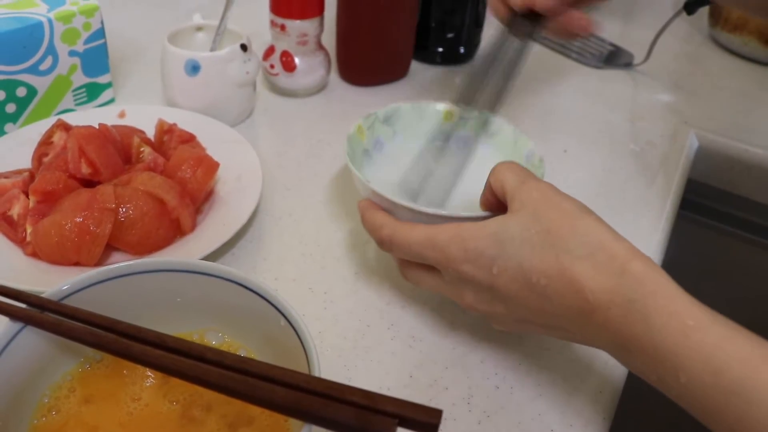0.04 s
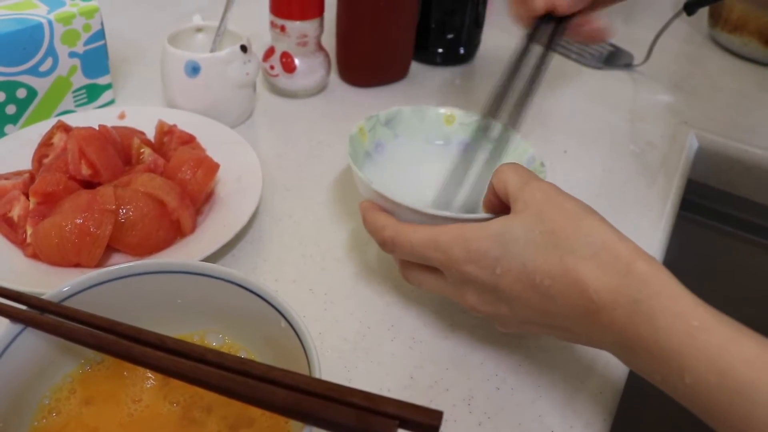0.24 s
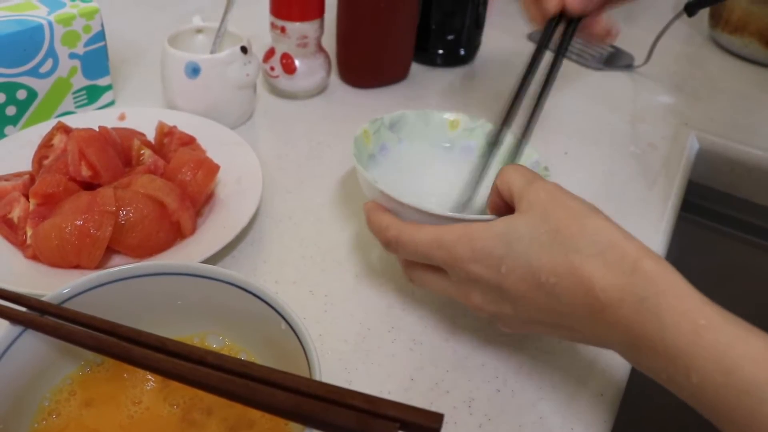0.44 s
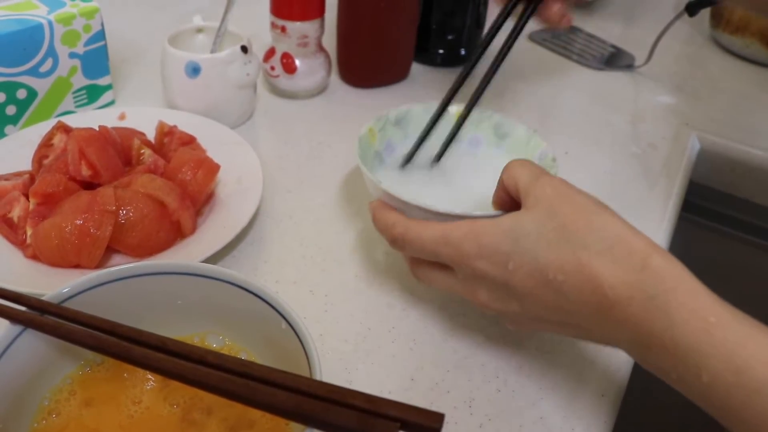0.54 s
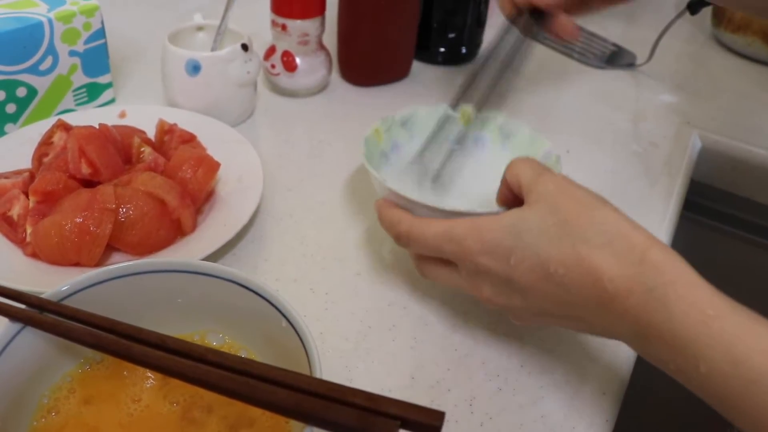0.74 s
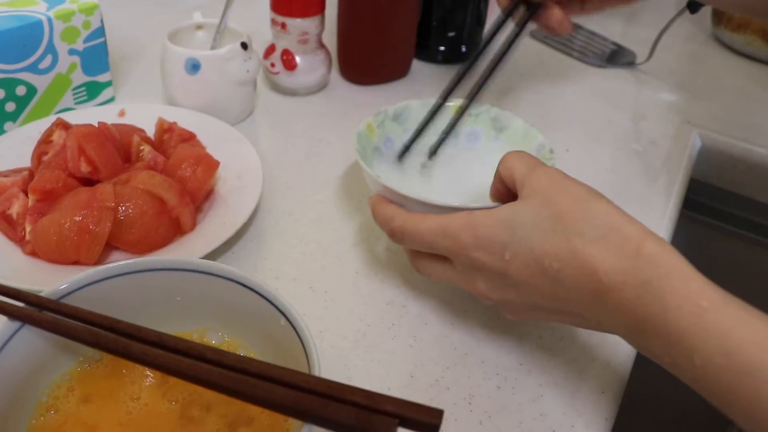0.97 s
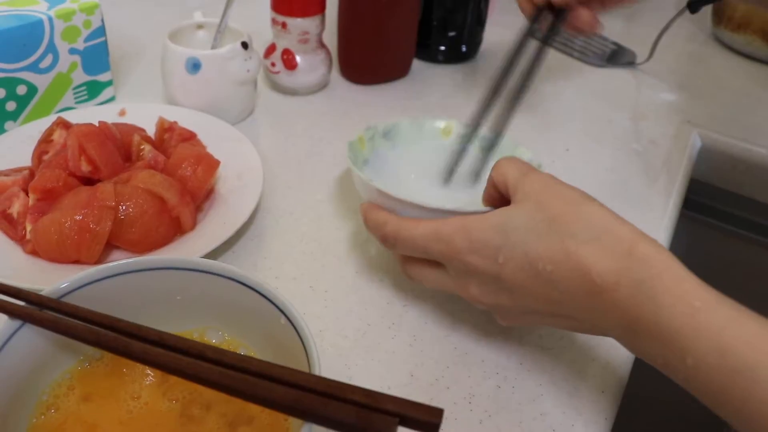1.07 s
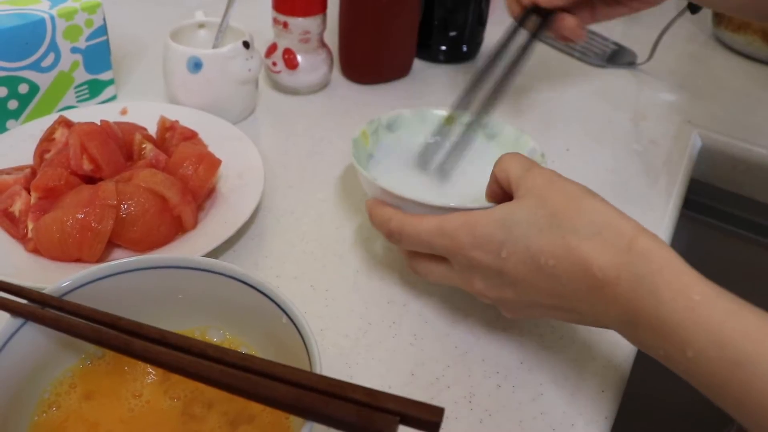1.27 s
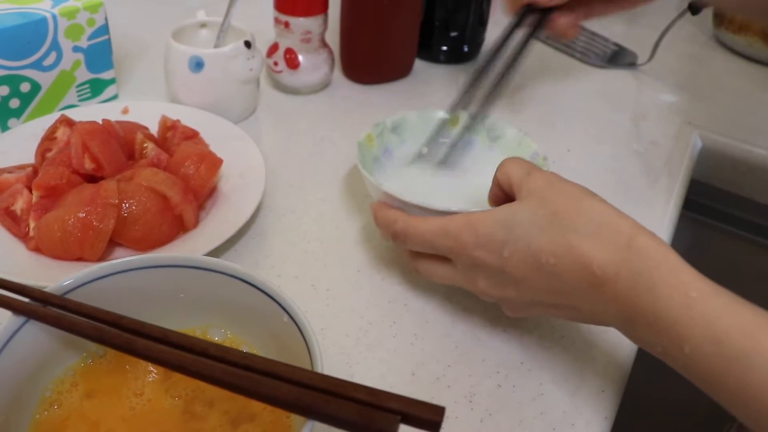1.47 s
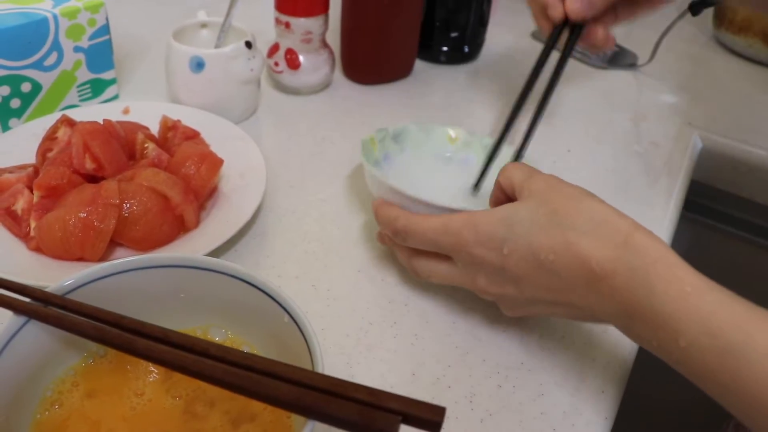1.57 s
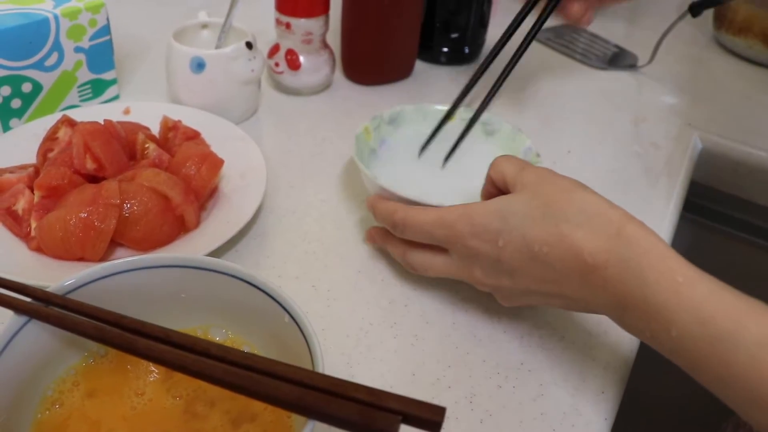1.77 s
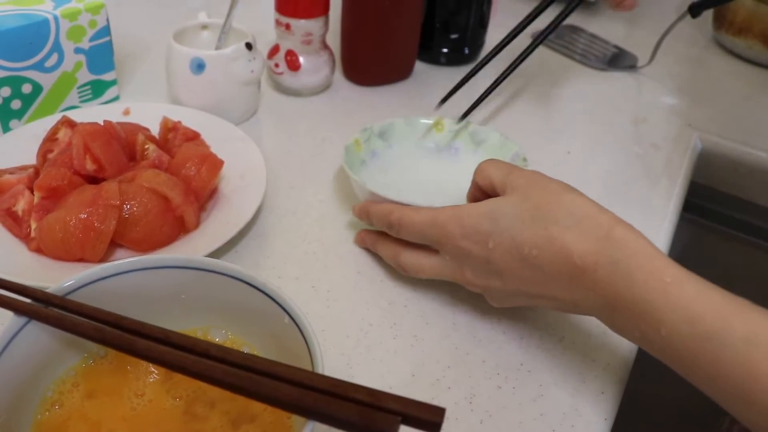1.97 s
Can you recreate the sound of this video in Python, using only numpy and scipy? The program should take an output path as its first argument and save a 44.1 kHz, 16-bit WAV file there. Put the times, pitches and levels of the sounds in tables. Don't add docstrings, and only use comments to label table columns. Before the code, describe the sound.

Chopsticks stir thin liquid in a small ceramic bowl, then a rim clink and two knocks

```python
import sys
import numpy as np
from scipy import signal
from scipy.fft import rfft, irfft, next_fast_len
from scipy.io import wavfile
from scipy.ndimage import uniform_filter1d, map_coordinates

SR = 44100
rng = np.random.default_rng(int(sys.argv[2]) if len(sys.argv) > 2 else 0)


def nominal_scale(level):
    x = np.asarray(level, float) / 20
    return 10 ** x


def master(y):
    cut = np.clip(np.atleast_2d(y).T, -1, 1)
    pcm = np.round(cut * 32767)
    wavfile.write(sys.argv[1], SR, pcm.astype(np.int16))


N = 88817

# [f/Hz, level/dB]
AIR_COLOUR = [(25, -19.5), (130, -1), (240, -6), (400, -5.5), (650, -13.5), (3030, -17.5), (4300, -24),
              (9660, -19.5), (13000, -25.5), (15800, -28)]
# [f/Hz, likeness 0-1]
CHANNEL_LIKENESS = [(40, 0.36), (130, 0.88), (290, 0.77), (640, 0.38), (1400, 0.078), (6000, 0)]
# [f/Hz, rms level/dB]
FRIDGE_LINES = [(36, -70), (182.5, -57.5), (320, -70.5)]
# [f/Hz, t60/s]
KITCHEN_T60 = [(150, 0.47), (260, 0.76), (400, 0.39), (1000, 0.44), (3000, 0.37), (8000, 0.11)]
# [f/Hz, level/dB]
KITCHEN_COLOUR = [(50, -38), (120, -5.5), (300, 1.5), (800, -0.5), (2000, -2.5), (3500, -14.5), (5000, -22),
                  (9000, -3.5)]
# [t/s, level/dB, hardness f/Hz, first snap level/dB]
KNOCKS = [
    (1.6277, 9, 3940, 11.5),
    (1.9945, 3.5, 2000, -27),
]
# [f/Hz, width/Hz, level/dB]
WORKTOP_MODES = [(1540, 224, 2), (428, 143, 1.5), (275, 108, -3), (3170, 230, -21), (1110, 284, 1),
                 (2130, 49, -17), (660, 215, -2)]
# [delay t/s, level/dB, left lag t/s]
KNOCK_ECHOES = [
    (0, -0.5, .0001),
    (.0018, 0.5, -.00005),
    (.0039, -7.5, .0001),
    (.0068, -8, -.00005),
]
# [f/Hz, level/dB, t60/s]
BOWL_MODES = [(2008, -16, 0.16), (3730, 0.5, 0.017), (5356, -30.5, .05), (6020, -13, 0.042),
              (6220, 2.5, 0.014), (6700, -24.5, 0.027), (6820, -21, 0.037), (8540, 1.5, 0.02),
              (8700, -23, 0.023), (11590, -11, 0.026), (14980, -22, .03), (15600, -24, .07),
              (12600, -21, .02)]
# [f/Hz, level/dB, t60/s]
RIM_NOTES = [(7650, -26, .2), (8595, -33, .35), (11220, -29, .15), (11580, -29, .3), (6078, -36, .25)]
# [t/s, peak level/dB, f/Hz, dull stick level/dB]
TICKS = [(0.1115, -40, 8900, -4), (0.023, -46, 12000, -8), (.196, -49, 11600, -8), (0.268, -50.5, 7700, -1),
         (0.3062, -51, 10000, 2), (0.367, -45, 6330, -6), (0.4634, -52.5, 9700, 16),
         (0.5277, -50, 10500, -12), (.582, -47, 6440, -10), (0.707, -54, 11400, -4),
         (.826, -50.5, 4240, 11), (.8914, -50, 11000, -6), (0.9046, -42, 11100, -8),
         (1.1787, -53, 7110, -8), (1.217, -50, 6000, 5), (1.3523, -52, 7600, -10), (0.567, -44, 6140, -16),
         (0.6746, -49, 4230, 9), (0.8043, -50, 11050, -7), (0.9144, -43, 11400, -2),
         (0.9387, -40, 6300, -18), (1.0103, -44.5, 8660, -4), (1.0244, -40, 7630, -3),
         (1.1861, -46.5, 7670, 2), (1.272, -47.5, 4500, 23), (1.3659, -39, 7760, -16),
         (1.4479, -35, 8630, 2), (1.4792, -39, 8740, -1), (1.532, -41.5, 5970, 9.5),
         (1.773, -47.5, 4500, -17), (1.803, -47, 7100, -10.5)]
# [t/s, peak level/dB, first f/Hz, last f/Hz, climb t/s]
GULPS = [
    (1.342, -48, 2100, 2950, .014),
    (1.4495, -42, 1550, 2400, .007),
    (1.4562, -33, 2300, 3230, .005),
    (.224, -52, 1900, 2400, .016),
]
# [t/s, peak level/dB, f/Hz, rise over life
# 0-1, t60/s]
BUBBLES = [(.118, -53, 2900, 0.1, 0.023), (.209, -53, 1630, 0.06, 0.067), (.024, -53, 1920, 0.02, 0.016),
           (.03, -52.5, 2800, 0.06, 0.032), (.043, -54, 1800, 0.07, 0.017), (.18, -54, 1930, 0.1, 0.021),
           (.483, -55, 1800, .05, .02), (1.394, -52, 2200, 0, .04), (0.267, -53, 1630, 0.1, 0.023),
           (.350, -54.5, 2570, 0.3, 0.031), (0.405, -55.5, 1776, 0.08, 0.028),
           (.575, -41.5, 2040, 0.06, 0.029), (0.656, -51, 4360, 0, 0.012), (.703, -46.5, 2800, 0.03, 0.042),
           (0.802, -43.5, 1800, 0.1, 0.025), (0.826, -45.5, 2710, 0.13, 0.022),
           (.834, -49, 2950, 0.03, .02), (.934, -52.5, 1953, 0.02, 0.042),
           (1.015, -40.5, 1484, 0.21, 0.064), (1.204, -51.5, 955, 0.19, 0.019),
           (1.26, -47, 2200, 0.29, 0.023), (1.287, -47.5, 1250, 0.06, 0.027),
           (1.4475, -42.5, 1397, 0.23, 0.055), (1.473, -47, 2090, .05, .03), (1.483, -51, 1950, 0, 0.025),
           (1.6215, -36, 2290, 0.1, 0.0093)]
# [f/Hz, width/Hz, level/dB]
LIQUID_MODES = [(1760, 234, -2), (2900, 280, 1.5)]
# [f/Hz, level/dB]
GLAZE_COLOUR = [(3500, -22), (3800, 4), (5000, 2.5), (6280, 3.5), (8000, 1.5), (11400, 6.5), (13500, 0),
                (16000, 2.5)]
# [f/Hz, width/Hz, level/dB]
GLAZE_RINGS = [(6180, 190, 0.5), (7630, 110, 7), (11400, 850, -1)]
# [middle t/s, half length t/s, scrape level/dB, slosh level/dB]
STROKES = [(0.032, 0.044, -53, -59), (0.134, 0.035, -61.5, -62), (0.226, 0.054, -60, -61.5),
           (0.364, 0.036, -56, -66.5), (0.451, 0.064, -59.5, -61), (0.575, 0.032, -54.5, -58),
           (0.662, 0.051, -59, -59.5), (0.712, 0.033, -54, -56.5), (0.801, 0.046, -58.5, -57),
           (0.931, 0.036, -51, -53), (1.018, 0.027, -52.5, -53.5), (1.126, 0.027, -70, -65),
           (1.186, 0.032, -56, -59), (1.281, 0.035, -62, -53), (1.382, 0.034, -53.5, -54.5),
           (1.483, 0.02, -54, -54.5), (1.573, 0.057, -79, -53.5)]


def unit(x):
    return x / np.sqrt(np.mean(x ** 2) + 1e-20)


def along(points, hz):
    f, v = np.transpose(points)
    return np.interp(np.log(hz + 1), np.log(f + 1), v)


def wobble(rate):
    knots = rng.standard_normal(int(N * rate / SR) + 4)
    return map_coordinates(knots, [np.arange(N) * rate / SR])


def flutter_db(t):
    return 2.5 * map_coordinates(rng.standard_normal(64), [t * 400])


def phase_blur(t, step):
    return step * rng.standard_normal(len(t)).cumsum()


def filtered(x, response):
    m = next_fast_len(N + SR // 2)
    return irfft(rfft(x, m) * response(np.fft.rfftfreq(m, 1 / SR)), m)[..., :N]


def peaks(table):
    def response(f):
        return sum((-1) ** k * nominal_scale(db) * 1j * f * width / (hz * hz - f * f + 1j * f * width)
                   for k, (hz, width, db) in enumerate(table))
    return response


def low_cut(hz):
    return lambda f: (1j * f / (hz + 1j * f)) ** 2


def add(track, s, sound):
    part = track[round(s * SR):][:len(sound)]
    part += sound[:len(part)]


def placed(x, pan_db, lag_s, low_db=None):
    sides = np.array([[1], [-1]])
    if low_db is None:
        low_db = pan_db

    def response(f):
        side_db = pan_db + (low_db - pan_db) / (1 + (f / 1800) ** 2)
        return nominal_scale(side_db / 2 * sides) * np.exp(-1j * np.pi * f * lag_s * sides)
    return filtered(x[None], response)


def pair(a, b):
    def mid_and_side(f):
        turn = np.arccos(np.clip(along(CHANNEL_LIKENESS, f), 0, 1)) / 2
        return np.array([np.cos(turn), np.sin(turn)])
    mid, side = filtered(np.array([a, b]), mid_and_side)
    return np.array([mid + side, mid - side])


def room_air():
    noise = filtered(rng.standard_normal((2, N)), lambda f: nominal_scale(along(AIR_COLOUR, f)))
    return nominal_scale(-56.5) * unit(pair(*noise))


def fridge():
    t, hum = np.arange(N) / SR, np.zeros(N)
    for hz, db in FRIDGE_LINES:
        level_db = db + 2 + 2 * wobble(13.77)
        hum += nominal_scale(level_db) * np.sin(2 * np.pi * hz * t + 0.3 * wobble(10.06))
    return hum


def kitchen(x):
    build_s, hall_s, hall_wide_s, hall_db, patchy_db = 0.0053, 0.11, 0.019, -9, 2
    hz, t, z = signal.stft(rng.standard_normal((2, SR * 3 // 4)), SR, nperseg=256)
    clumps = uniform_filter1d(rng.standard_normal(z.shape[1:]), size=3, axis=0)
    clumps = unit(uniform_filter1d(clumps, size=6, axis=1))
    hall = nominal_scale(hall_db) * np.exp(-((t - hall_s) / hall_wide_s) ** 2)
    swell = (1 - np.exp(-t / build_s)) * (1 + hall)
    level_db = patchy_db * clumps - 60 * t / along(KITCHEN_T60, hz)[:, None]
    tail = signal.istft(z * nominal_scale(level_db) * swell, SR, nperseg=256)[1]
    wet = signal.fftconvolve(x[None], tail / np.linalg.norm(tail[0]), axes=1)[:, :N]
    return pair(*filtered(wet, lambda f: nominal_scale(along(KITCHEN_COLOUR, f))))


def near_walls(x):
    t60, build_s = 0.2, 0.0013
    t = np.arange(SR // 4) / SR
    tail = rng.standard_normal((2, len(t))) * nominal_scale(-60 * t / t60) * (1 - np.exp(-t / build_s))
    return signal.fftconvolve(x[None], tail / np.linalg.norm(tail[0]), axes=1)[:, :N]


def knocks():
    snap_lead_s = 0.00023
    push, snap, t = np.zeros(N), np.zeros(N), np.arange(SR // 100) / SR
    for s, db, hardness_hz, snap_db in KNOCKS:
        shape = np.exp(-(4 * hardness_hz * t - 2) ** 2)
        add(push, s, nominal_scale(db) * shape / shape.sum())
        snap[round((s - snap_lead_s) * SR)] = -nominal_scale(snap_db)

    def worktop(f):
        return sum(peaks([mode])(f) for mode in WORKTOP_MODES) * low_cut(301)(f)

    def snap_colour(f):
        return peaks([(4300, 3240, 0)])(f) ** 2 / (1 + (f / 13300) ** 16)
    return push, nominal_scale(-3.5) * (10 * filtered(push, worktop) + filtered(snap, snap_colour))


def thrown_knocks(blows, dull):
    out = np.zeros((2, N))
    for delay, db, lag in KNOCK_ECHOES:
        echo = np.roll(dull if delay else blows, round(delay * SR))
        out += nominal_scale(db) * placed(echo, -10.5, lag, low_db=0.5)
    return out


def clink():
    t = np.arange(SR // 4) / SR
    ring = np.zeros(len(t))
    for modes, blur in ((BOWL_MODES, 1), (RIM_NOTES, 0.35)):
        for hz, db, t60 in modes:
            sway = map_coordinates(rng.standard_normal(80), [t * 300])
            sway_db = 4 * np.minimum(t / 0.0047, 1) * sway
            phase = 2 * np.pi * hz * t + phase_blur(t, blur * 0.11 * hz / 8000)
            ring += nominal_scale(db + sway_db - 60 * t / t60) * np.sin(phase)
    crack = nominal_scale(-23 - 60 * t / 0.015) * np.diff(rng.standard_normal(len(t) + 1))
    out = np.zeros(N)
    add(out, 1.5769, nominal_scale(-16.5) * (1 - np.exp(-t / 0.00021)) * (ring + crack))
    return filtered(out, low_cut(1300))


def ticks():
    note_t60, crack_t60, stick_t60, stick_hz = 0.009, 0.0043, 0.0086, 2000
    out, t = np.zeros(N), np.arange(SR // 20) / SR
    for s, db, hz, dull_db in TICKS:
        note = nominal_scale(-60 * t / note_t60) * np.sin(2 * np.pi * hz * t + phase_blur(t, 0.12))
        grit = np.convolve(rng.standard_normal(len(t)), [1, 0, -1], "same")
        crack = nominal_scale(-3 - 60 * t / crack_t60) * grit
        stick = nominal_scale(dull_db - 6.5 - 60 * t / stick_t60) * np.sin(2 * np.pi * stick_hz * t)
        add(out, s, nominal_scale(db + 1.5) * (1 - np.exp(-t / 0.00027)) * (note + crack + stick))
    return out


def gulps():
    start_db, t60 = -8, 0.022
    out, t = np.zeros(N), np.arange(SR // 8) / SR
    for s, db, low_hz, high_hz, climb in GULPS:
        closed = np.clip(t / climb, 0, 1)
        ring_db = -60 * np.maximum(t - climb, 0) / t60
        level_db = db + start_db * (1 - closed) + ring_db + flutter_db(t)
        pitch = low_hz + (high_hz - low_hz) * np.sin(np.pi / 2 * closed) ** 2
        phase = 2 * np.pi * np.cumsum(pitch) / SR + phase_blur(t, 0.05)
        add(out, s, nominal_scale(level_db) * (1 - np.exp(-t / 0.001)) * np.sin(phase))
    return out


def bubbles():
    out, t = np.zeros(N), np.arange(SR // 8) / SR
    for s, db, hz, rise, t60 in BUBBLES:
        pitch = hz * (1 + rise * (1 - np.exp(-t / (0.14 * t60))))
        level_db = db + 3 - 30 * t / t60 - 60 * (t / t60) ** 2 + flutter_db(t)
        phase = 2 * np.pi * np.cumsum(pitch) / SR + phase_blur(t, 0.05)
        add(out, s, nominal_scale(level_db) * (1 - np.exp(-t / 0.0011)) * np.sin(phase))
    return out


def droplets():
    count, cycles, rise = 900, 9, 0.15
    when = rng.random((count, 1))
    octaves = 0.33 * np.maximum(rng.standard_normal((count, 1)), -2)
    size_db = 5 * np.minimum(rng.exponential(1, (count, 1)), 2)
    k = np.arange(SR // 80)
    hz = np.minimum(2200 * 2 ** octaves, 3100)
    u = k * hz / SR / cycles
    tone = np.sin(2 * np.pi * cycles * u * (1 + rise * u / 2))
    grains = nominal_scale(size_db) * u * np.exp(-4 * u) * tone
    places = (when * N).astype(int) + k
    return unit(np.bincount(places.ravel(), grains.ravel())[:N])


def slosh():
    pops_per_s = 3500
    pops = (rng.random(N) < pops_per_s / SR) * rng.standard_normal(N) * nominal_scale(2 * wobble(120))
    churn = filtered(pops, lambda f: peaks(LIQUID_MODES)(f) * peaks([(2300, 2500, 0)])(f) ** 2)
    return unit(unit(churn) + droplets())


def scrape():
    grit = rng.standard_normal(N) * nominal_scale(2 * wobble(270))

    def glaze(f):
        rings = 1 + 3 * nominal_scale(-6) * abs(peaks(GLAZE_RINGS)(f))
        return nominal_scale(along(GLAZE_COLOUR, f)) * (f > 3300) * rings
    return unit(filtered(grit, glaze))


def stirring():
    t = np.arange(N) / SR
    scrape_level, slosh_level = np.zeros(N), np.zeros(N)
    for middle, half, scrape_db, slosh_db in STROKES:
        stroke = np.exp(-2 * ((t - middle) / half) ** 2)
        scrape_level += nominal_scale(scrape_db) * stroke
        slosh_level += nominal_scale(slosh_db) * stroke
    return scrape_level * scrape() + slosh_level * slosh()


def scene():
    push, blows = knocks()
    rim = clink()
    bowl = stirring() + bubbles() + gulps() + ticks()
    dull = filtered(blows, lambda f: 1 / (1 + 1j * f / 2200) ** 3)
    near = placed(bowl, -7.5, 0.000036) + placed(rim, -7.5, 0.0000275)
    near += thrown_knocks(blows, dull)
    near += nominal_scale(-10.5) * near_walls(rim) + nominal_scale(1.5) * pair(*near_walls(dull))
    far = kitchen(nominal_scale(-10.5) * (bowl + rim) + nominal_scale(10) * push)
    return near + far + room_air() + fridge()


def band_limit(x):
    return signal.sosfilt(signal.butter(12, 16530, fs=SR, output="sos"), x)


def record(dry):
    duck_db, stays_db, hold_s, back_s = -9, -2, 0.035, 0.11
    splice_s, splice_half_s, splice_depth_db = 0.2536, 0.0083, -18
    clip_at, top_hz = 0.62, 15950
    t = np.arange(N) / SR
    since = t - KNOCKS[0][0]
    onset = np.clip((since - 0.001) / 0.0045, 0, 1)
    recovery = np.clip(1 - (since - hold_s) / back_s, 0, 1)
    gain_db = onset * (stays_db + duck_db * recovery)
    gain_db += splice_depth_db * np.clip(1 - abs(t - splice_s) / splice_half_s, 0, 1)
    clipped = np.clip(dry * nominal_scale(gain_db), -clip_at, clip_at)
    mix = filtered(clipped, lambda f: f < top_hz)
    return band_limit(mix)


dry = scene()
out = record(dry)
master(out)
```